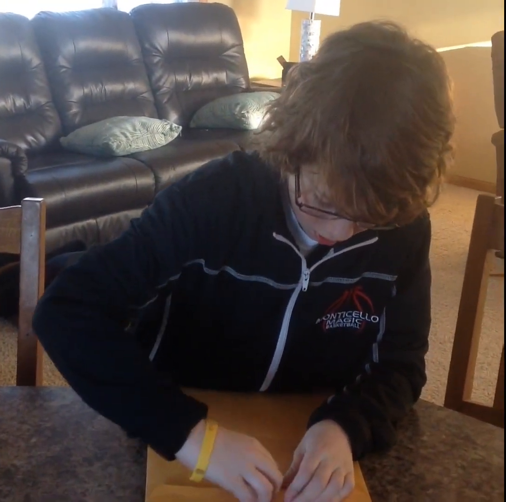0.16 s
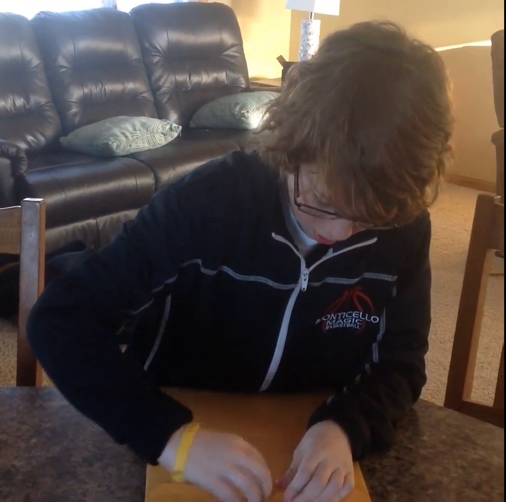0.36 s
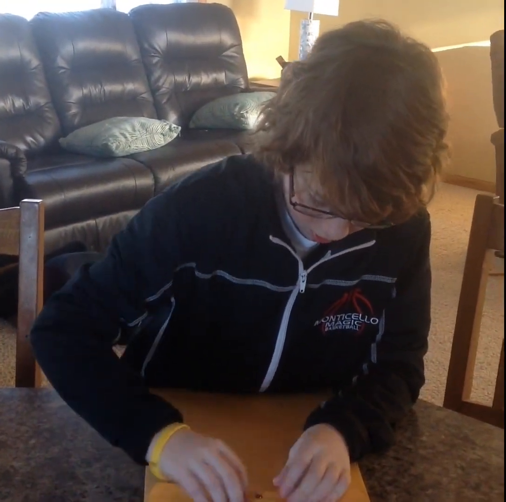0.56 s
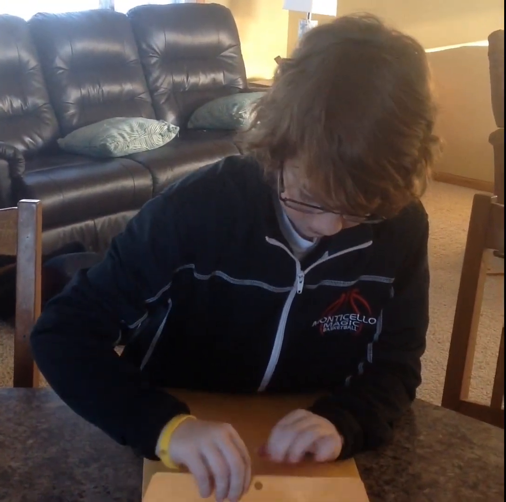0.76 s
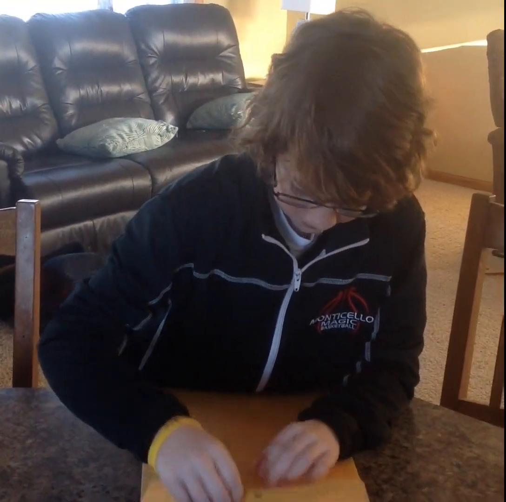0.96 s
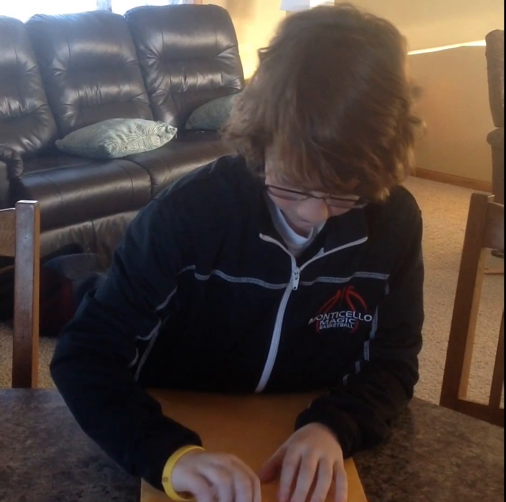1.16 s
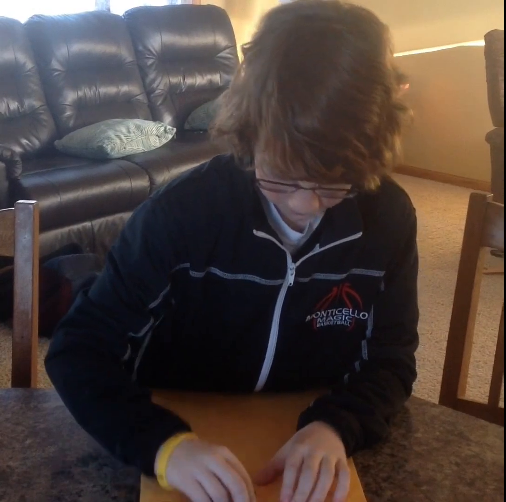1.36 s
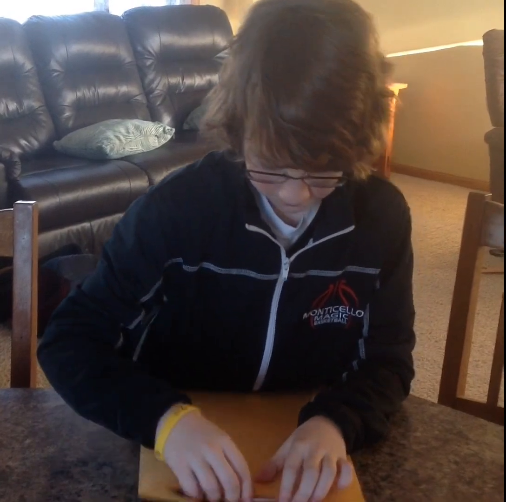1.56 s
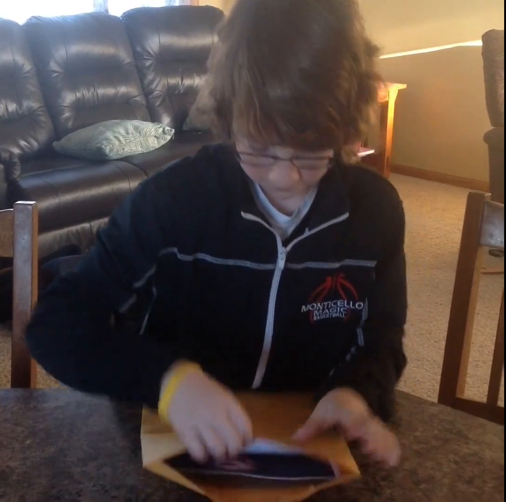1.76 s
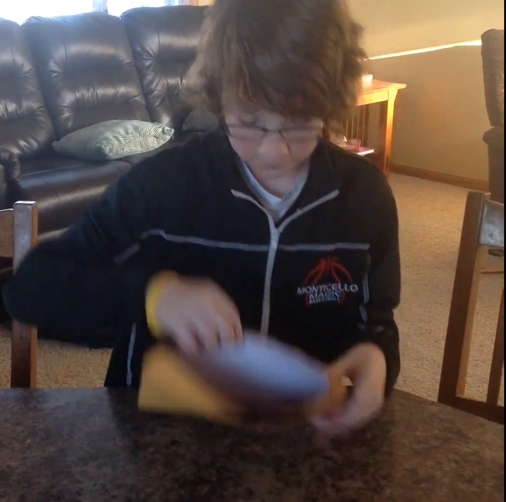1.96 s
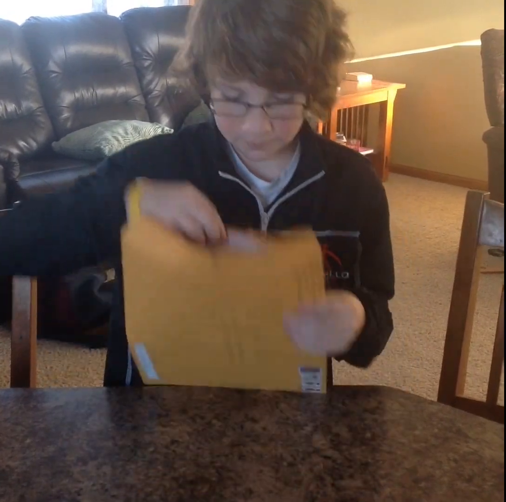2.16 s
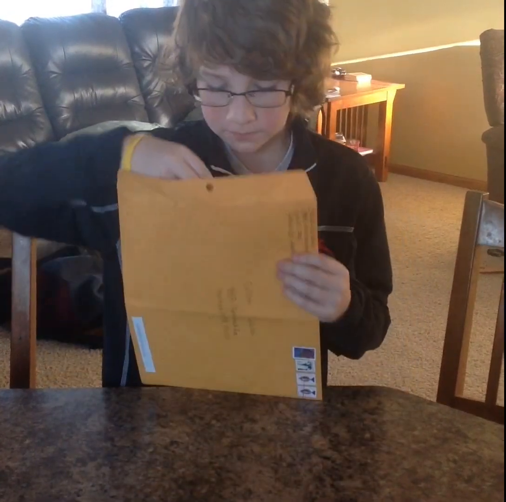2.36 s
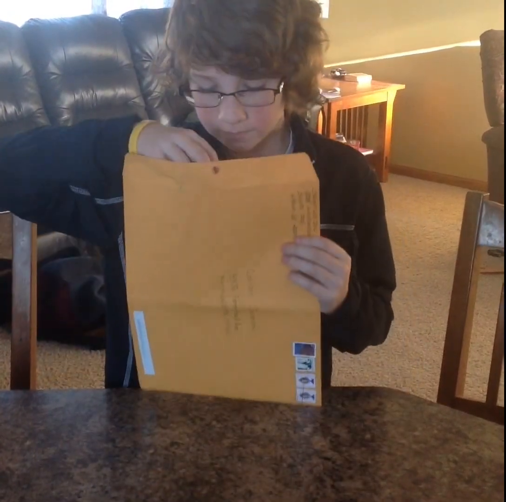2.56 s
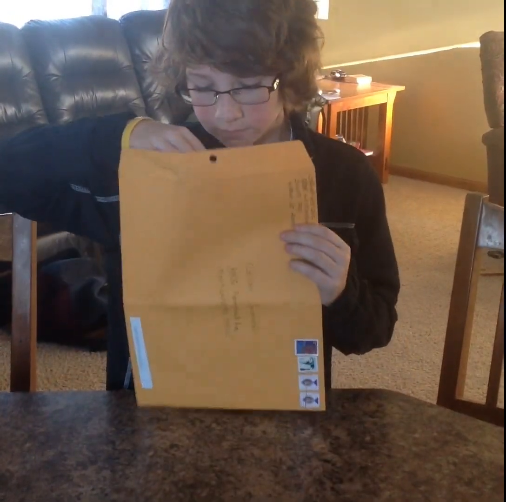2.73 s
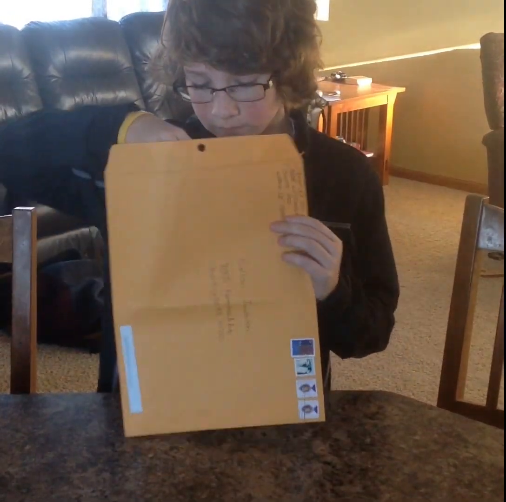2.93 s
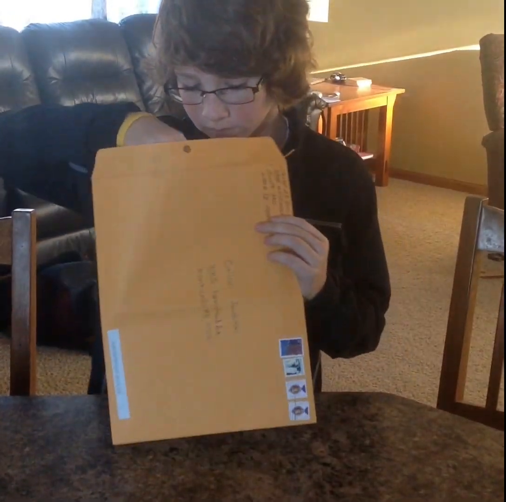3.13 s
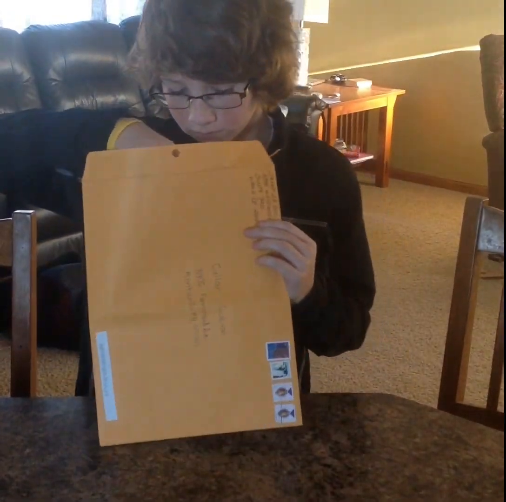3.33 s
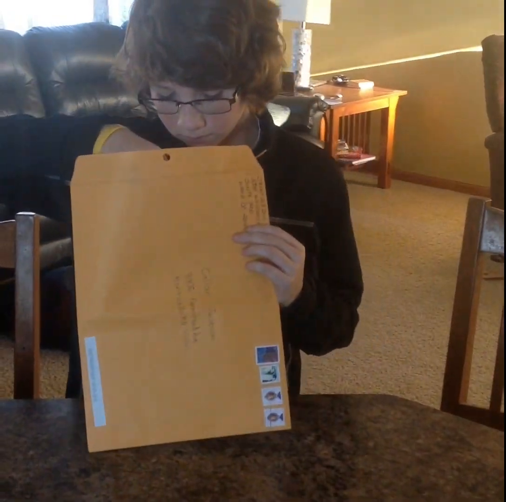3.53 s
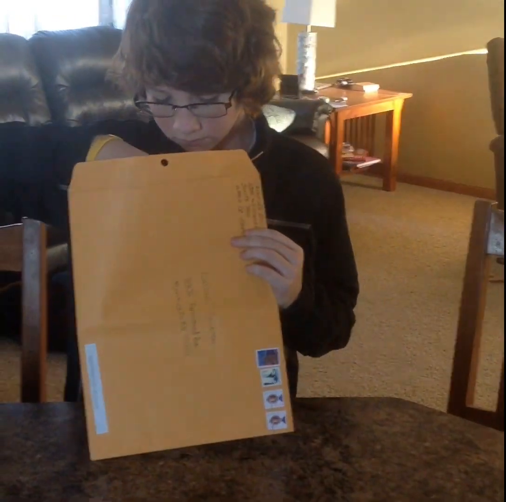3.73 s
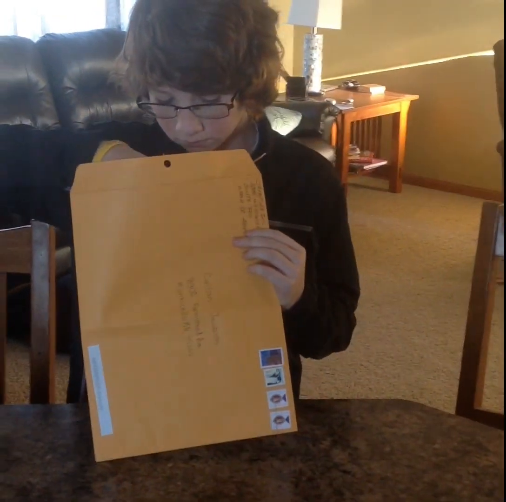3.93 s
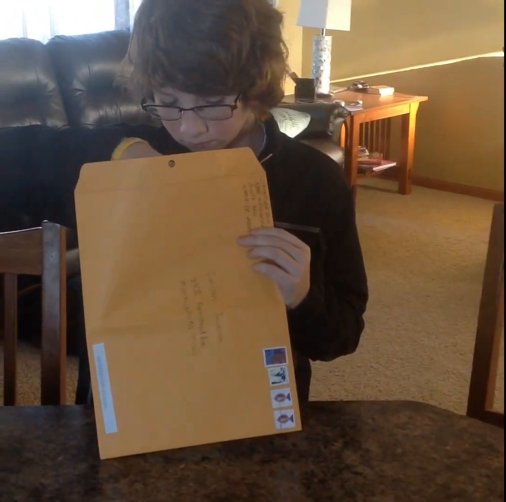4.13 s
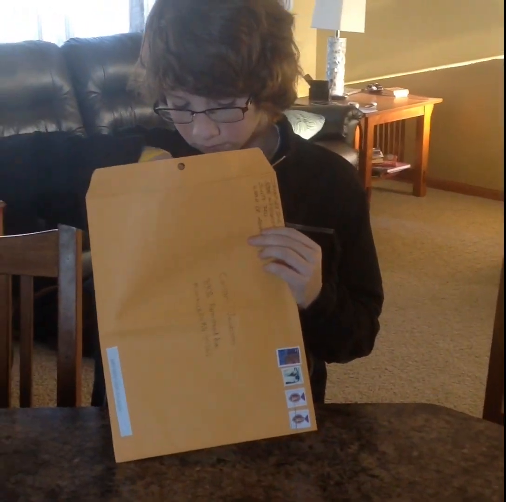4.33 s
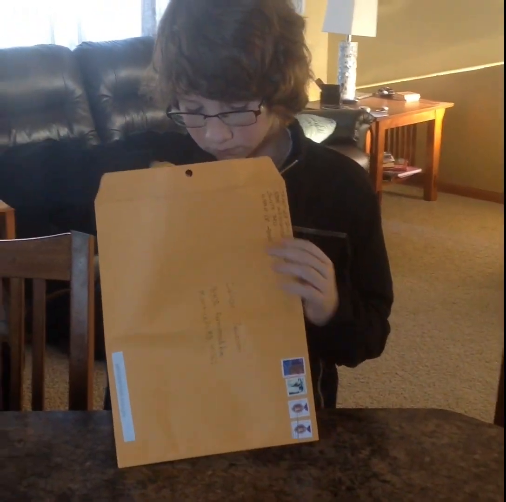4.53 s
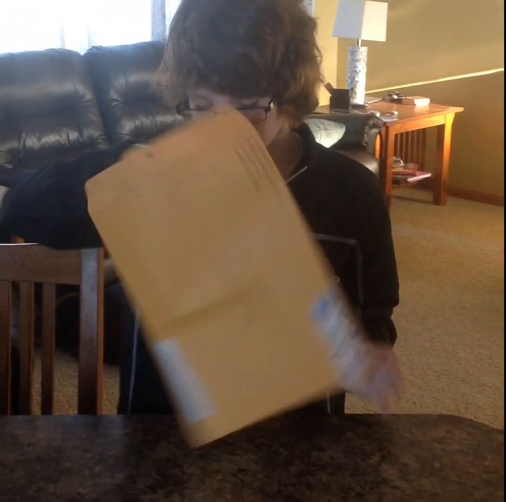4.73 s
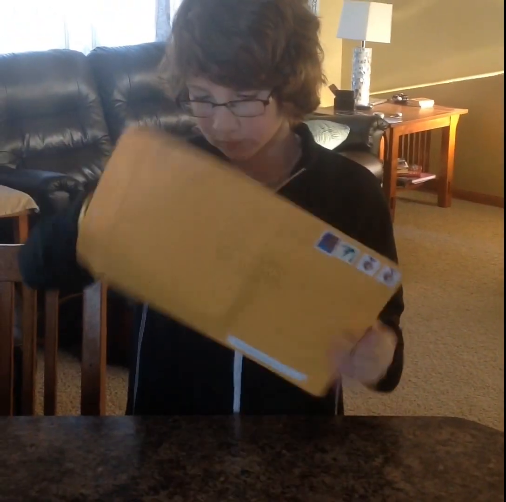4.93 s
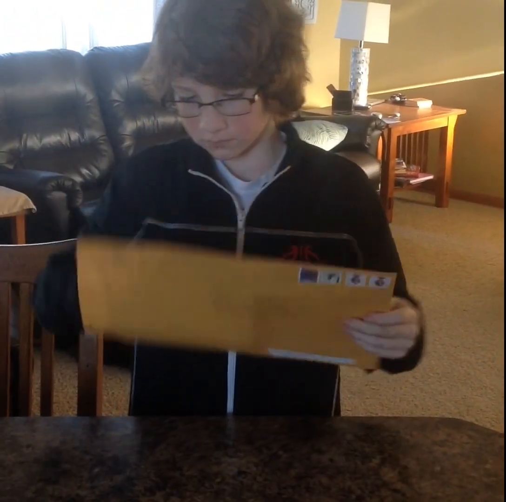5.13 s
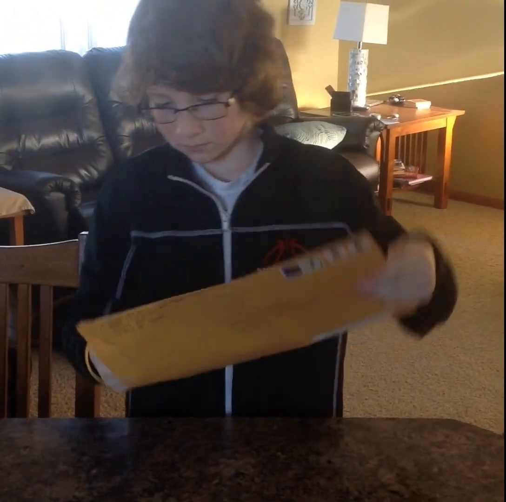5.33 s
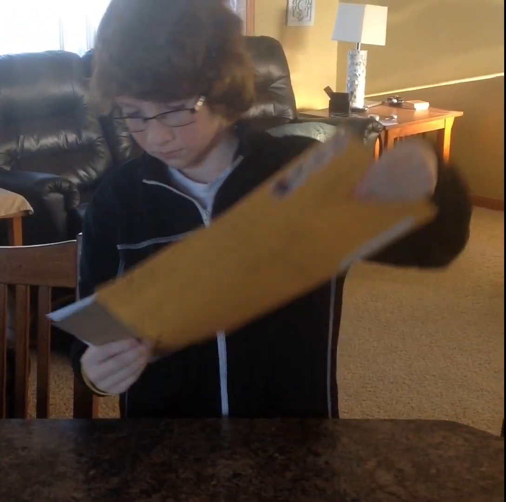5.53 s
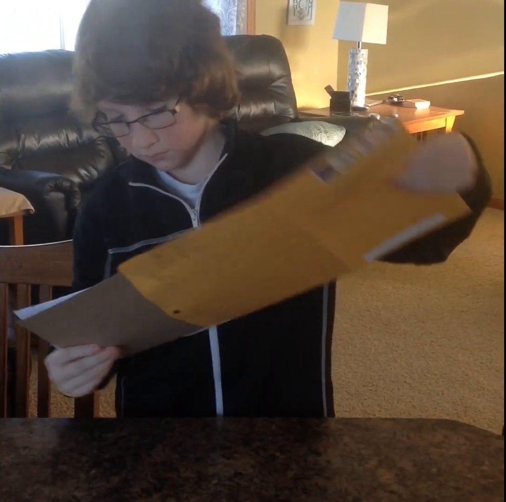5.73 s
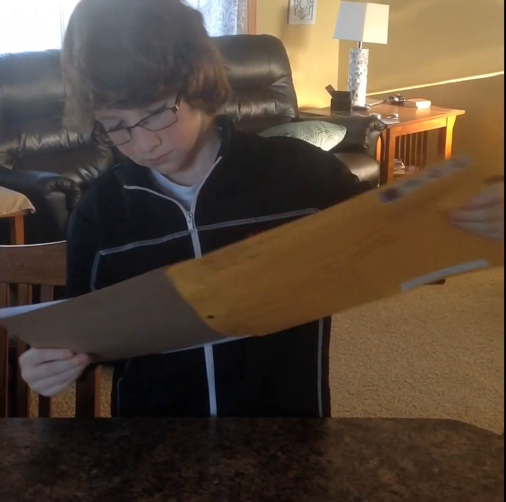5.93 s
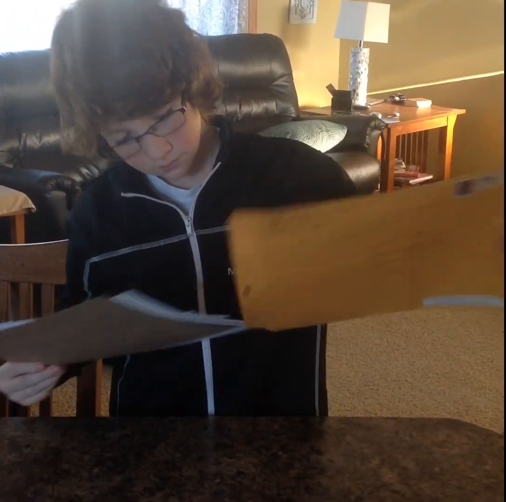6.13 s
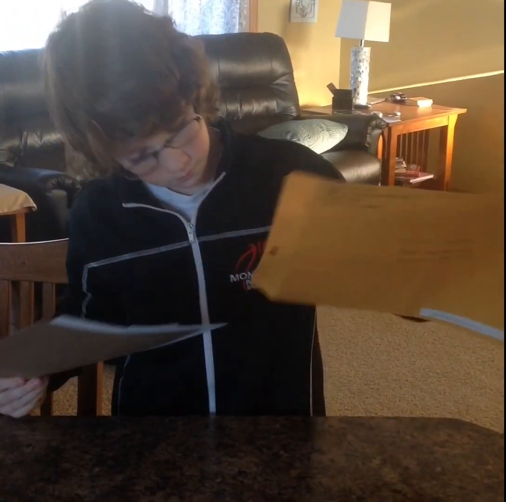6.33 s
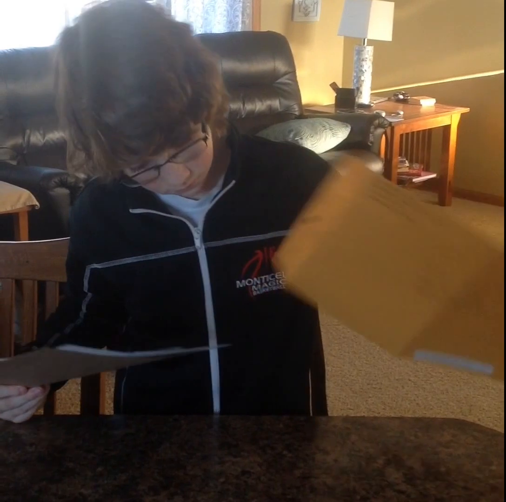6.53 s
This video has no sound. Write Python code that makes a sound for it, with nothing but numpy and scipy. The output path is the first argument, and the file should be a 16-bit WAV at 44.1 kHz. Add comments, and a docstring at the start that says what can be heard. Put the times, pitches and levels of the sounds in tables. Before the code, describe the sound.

A large paper envelope is unfastened at a table, close to the microphone, with soft rubbing, small pops and a dull fingertip press at about 1.3 seconds. The crackling builds, and at about 1.9 seconds the envelope flexes open with one sharp snap, the loudest sound. From 2.2 to 3.2 seconds the stiff paper buckles in crisp pops, crinkles and light thumps. Fingers then flick faintly at the sheets inside until about 4.2 seconds, when stronger crackles return, with a tiny click near 5 seconds. From about 5.2 to 6.2 seconds the papers slide out in several hissing strokes, their edge scraping lightly on the envelope's mouth amid more pops. A couple of weak crinkles follow by 6.6 seconds. Throughout, a clock ticks faintly once a second, stronger and weaker by turns, over the low air of a quiet living room.

```python
"""A large paper envelope is unfastened at a table and flexed open with one loud snap; papers slide out.
Stiff paper buckles in pops and thumps. Fingers and sheets rub in small slips, heard as hiss and crinkle;
the sheets' edge scrapes the envelope's mouth. A clock ticks in the quiet living room.
One microphone nearby hears it all."""
import sys
import numpy as np
from scipy import signal
from scipy.io import wavfile

SR = 44100
rng = np.random.default_rng(int(sys.argv[2]) if len(sys.argv) > 2 else 0)


def unload_audio(sound):
    """Save the sound as a 16-bit wav file, at the path given as the first command line argument."""
    columns = np.transpose(np.atleast_2d(sound))
    # keep every value between -1 and 1, then stretch to whole-number steps
    steps = np.round(np.clip(columns, -1, 1) * 32767)
    wavfile.write(sys.argv[1], SR, steps.astype(np.int16))


N = 290573

# the snap and its two early echoes: (time [s], level [dB], decay [s], crackle share [0-1])
SNAP_PEAKS = [(1.9307, -0.5, 0.0062, 1), (1.937, 1, 0.0024, 0.56), (1.9426, -3, 0.0018, 0.5)]
# buckles: (time [s], ring level [dB], corner [Hz], base decay [s], thump level [dB], crisp level [dB])
BUCKLES = [(0.121, -27.5, 1740, 0.0055, -36, -52), (0.591, -34, 3020, 0.0083, -45, -39),
           (0.714, -27, 2420, 0.0061, -45, -35), (0.814, -20.5, 1800, .012, -31.5, -30),
           (0.955, -29, 1410, .009, -39, -40), (1.068, -18, 2680, 0.0049, -28, -57),
           (1.137, -26.5, 3650, 0.0074, -28.5, -46), (1.727, -23, 2820, 0.014, -38, -35),
           (1.761, -21, 2480, 0.018, -34.5, -51), (1.822, -16, 1400, .012, -58, -32),
           (1.896, -16.5, 1190, 0.017, -45, -51), (2.211, -19.5, 850, .007, -29, -40),
           (2.276, -11.5, 3220, .006, -29, -23), (2.311, -16.5, 1660, 0.0015, -27, -43),
           (2.335, -9, 2960, 0.0052, -27, -46), (2.4432, -10, 3160, .0025, -26.5, -25.5),
           (2.647, -18, 2370, 0.025, -18.5, -49), (2.866, -19.5, 2870, .022, -38, -42),
           (3.039, -15, 2480, 0.0082, -25.5, -32), (3.158, -27, 1700, .015, -37, -46),
           (4.23, -23, 2900, .018, -23, -37), (4.285, -15.5, 2100, .026, -31, -44),
           (4.499, -22, 2130, 0.015, -28, -35), (4.531, -24, 1960, .01, -42, -34),
           (4.893, -29.5, 1890, 0.0085, -38, -40), (4.951, -24.5, 1810, .018, -46, -39),
           (5.034, -19.5, 3100, 0.048, -24, -33), (5.57, -17, 2510, 0.019, -27, -26),
           (5.757, -18, 1830, 0.013, -26, -37), (5.984, -16, 2100, 0.032, -21.5, -26),
           (6.249, -25, 2420, 0.0074, -42, -46), (6.553, -32, 1630, 0.0084, -28.5, -48)]
# paper patch with a 2000 Hz corner: (frequency [Hz], gain [dB], emphasis weight [ratio])
PATCH_SPECTRUM = [(99, -49, 0), (240, -5.5, 0), (485, 0.5, 0), (1300, 2.5, -0.3), (1600, 0.5, 0.3),
                  (1830, 0.5, 1.5), (2150, -1.5, 0.5), (2640, -6.5, 0.42), (3680, -15, 0.2), (9000, -35, 0)]
# paper on paper and skin: (start [s], rise [s], decay [s], level [dB])
STROKES = [ (0.64, 0.043, 0.028, -60.5), (0.755, 0.069, 0.019, -53), (1.11, .03, .03, -60),
           (1.23, .03, .05, -62), (1.28, 0.017, 0.045, -54.5), (1.44, 0.059, 0.051, -50.5),
           (1.55, 0.02, 0.048, -55.5), (2.519, 0.055, .16, -56.5), (2.69, .07, 0.094, -56.5),
           (2.8, 0.058, 0.12, -52.5), (3.26, .03, 0.15, -60.5), (3.449, 0.091, .4, -65),
           (3.79, 0.063, .03, -61), (4.16, 0.083, .08, -56.5), (4.31, .06, 0.074, -58.5),
           (4.655, 0.078, 0.048, -52), (4.872, 0.028, 0.031, -59), (5.025, 0.017, 0.034, -53),
           (5.16, 0.067, 0.16, -58.5), (5.254, 0.089, 0.12, -44), (5.469, 0.058, 0.17, -40),
           (5.67, 0.071, 0.19, -46.5), (5.849, 0.059, 0.092, -45.5), (5.96, 0.037, .04, -50),
           (6.029, .03, 0.046, -44.5), (6.16, .07, 0.021, -53.5)]
# envelope bending: (start [s], length [s], crinkle level [dB], rumble level [dB])
BENDS = [(0.665, 0.18, -62, -80), (1.056, 0.35, -76, -65.5), (1.44, 0.26, -70, -66),
         (1.677, 0.32, -60, -70), (2.197, 0.28, -55, -57.5), (2.464, 0.31, -53, -58),
         (2.785, 0.14, -51.5, -65), (3.05, 0.31, -62, -65), (3.64, 0.69, -63.5, -73),
         (4.166, 0.28, -57.5, -67.5), (4.618, 0.28, -59, -74), (4.841, 0.31, -64, -64),
         (5.247, 0.37, -54, -72), (5.53, 0.16, -53, -55.5), (5.728, 0.54, -60, -65.5)]
# sheet edge on the mouth: (start [s], length [s], starting resonance [Hz], level [dB])
SCRAPES = [(5.592, .06, 3220, -48), (5.745, .1, 3130, -49.5), (5.86, .08, 3670, -57),
           (6.198, .08, 2350, -60)]
# fingertip presses and tiny clicks: (time [s], level [dB])
PRESSES = [(1.298, -24)]
CLICKS = [(5.0217, -16.5)]
# spectral shapes: (frequency [Hz], gain [dB])
SNAP_SPECTRUM = [(53, -37), (110, -42), (182, -4.5), (257, -17.5), (362, -13.5), (688, -3.5), (850, -6.5),
                 (1130, -8), (1250, -7.5), (2090, -6), (2760, -3), (3280, -6.5), (5370, -7.5), (12600, -20),
                 (15000, -32)]
PANEL_SPECTRUM = [(40, -43), (80, -26), (120, -11), (175, 1), (340, 7), (520, -0.5), (1200, -22),
                  (4000, -68)]
CRISP_SPECTRUM = [(500, -6), (2500, 9), (5000, -1), (9000, 2), (15000, -24)]
SLIDE_SPECTRUM = [(250, -38), (600, -21), (1200, -14), (2000, -8.5), (3000, -3.5), (4500, -6), (7000, -5.5),
                  (11000, -8.5), (14300, -8), (15500, -20)]
CRINKLE_SPECTRUM = [(180, -38), (300, -19), (422, 0.5), (586, -24), (656, 1), (1030, -6), (1230, -2.5),
                    (1910, 0.5), (2080, -3.5), (3140, -2.5), (9000, -15), (11700, -16.5), (19800, -120)]
CLICK_SPECTRUM = [(500, -35), (2500, -15), (4500, -7), (6000, -0.5), (10000, 1), (15000, -9)]
ROOM_TONE_SPECTRUM = [(15, -76), (25, -57), (59, -25), (135, -2), (167, -0.5), (196, 0.5), (354, -0.5),
                      (450, -3.5), (488, -8.5), (833, -3.5), (978, -11.5), (1240, -5), (1580, -11.5),
                      (1960, -8.5), (3200, -13), (7000, -15), (15000, -18)]
# clock case modes: (frequency [Hz], relative level [dB], T60 [s])
CLOCK_MODES = [(723, 0, 0.037), (757, 2.5, 0.048), (1180, -11.5, 0.1), (1740, -4, 0.061), (1790, -3, 0.03),
               (3230, -6.5, 0.032)]
# room decay: (frequency [Hz], T60 [s])
ROOM_T60 = [(150, 0.34), (700, 0.62), (2500, 0.56), (5000, 0.45), (9000, 0.35), (12500, 0.23),
            (15000, 0.099)]
# table, wall and ceiling echoes: (delay [s], relative gain [ratio])
ECHOES = [(.0021, 0.22), (.0064, 0.35), (0.0124, 0.36), (0.017, .25), (.022, .22)]


def envelope_snap():
    """One loud snap, heard as three sharp peaks about 6 ms apart: the crack and two strong early echoes."""
    out, paper = np.zeros(N), impulse(SNAP_SPECTRUM)
    for time_s, level_db, decay_s, crackle in SNAP_PEAKS:
        peak = amp(level_db) * burst(paper, decay_s, crackle)
        add(out, time_s, room(peak, wet_db=-1.3, echo_db=-6))
    return out


def paper_buckles(hard_db=-16, emphasis_per_db=0.3, max_emphasis_db=5.5):
    """Each buckle rings a patch up to a corner set by its size and shoves the panel."""
    out, panel, edge = np.zeros(N), impulse(PANEL_SPECTRUM), impulse(CRISP_SPECTRUM)
    for time_s, ring_db, corner_hz, decay_s, thump_db, crisp_db in BUCKLES:
        # hard buckles bring out the patch's mode, just under the corner
        emphasis_db = np.clip(emphasis_per_db * (ring_db - hard_db), 0, max_emphasis_db)
        spectrum = [(hz, db + weight * emphasis_db) for hz, db, weight in PATCH_SPECTRUM]
        patch = impulse(spectrum, stretch=corner_hz / 2000)
        ring = amp(ring_db) * burst(patch, decay_s, crackle=1 - np.exp(-decay_s / 0.00057))
        crisp = amp(crisp_db) * burst(edge, decay_s + 0.0058, crackle=0.97)
        thump = amp(thump_db) * burst(panel, decay_s + 0.0022, crackle=0.99)
        add(out, time_s, room(ring + crisp + thump, wet_db=-3, echo_db=-2.5))
    return out


def paper_friction():
    """Strokes hiss in fine slips; bends crinkle in coarser ones and rumble the panels."""
    sliding = power_sum((start_s, amp(db) * stroke(rise_s, decay_s))
                        for start_s, rise_s, decay_s, db in STROKES)
    creasing = power_sum((start_s, amp(db) * arch(length_s)) for start_s, length_s, db, _ in BENDS)
    heaving = power_sum((start_s, amp(db) * arch(length_s)) for start_s, length_s, _, db in BENDS)
    hiss = sliding * slips(SLIDE_SPECTRUM, rate_hz=2500, spread_db=0, hiss_gain=1.33)
    crinkle = creasing * slips(CRINKLE_SPECTRUM, rate_hz=400, spread_db=0.5, hiss_gain=1)
    rumble = heaving * slips(PANEL_SPECTRUM, rate_hz=150, spread_db=4, hiss_gain=1)
    return room(hiss, wet_db=-6, echo_db=-43) + room(crinkle + rumble, wet_db=-5.5, echo_db=-15)


def edge_scrapes(climb_hz_per_s=1700, width_hz=480):
    """Slips of the sheets' edge drive a narrow resonance that climbs as they come out."""
    out, friction = np.zeros(N), slips(CRISP_SPECTRUM, rate_hz=590, spread_db=0, hiss_gain=0.6)
    for start_s, length_s, start_hz, level_db in SCRAPES:
        effort = arch(length_s)
        force = friction[round(start_s * SR):][:len(effort)]
        pitch_hz = start_hz + climb_hz_per_s * np.arange(len(effort)) / SR
        tone = resonate(resonate(force, pitch_hz, width_hz), pitch_hz, width_hz)
        add(out, start_s, amp(level_db) * effort * np.sqrt(len(tone)) * unit(tone))
    return out


def finger_flicks(start_s=3.4, length_s=0.8, rate_hz=14, min_db=-41.75, range_db=7):
    """Fingers flick the sheets inside: faint buckles of random time, size and strength."""
    out, spectrum = np.zeros(N), [(hz, db) for hz, db, _ in PATCH_SPECTRUM]
    for when, pitch, strength in rng.random((round(rate_hz * length_s), 3)):
        patch = impulse(spectrum, stretch=0.95 + pitch)
        flick = amp(min_db + range_db * strength) * burst(patch, decay_s=0.009, crackle=1)
        add(out, start_s + when * length_s, flick)
    return room(out, wet_db=-4, echo_db=-9)


def touches():
    """A fingertip presses the envelope on the table; later, a tiny click. Both close, nearly dry."""
    out, panel, click = np.zeros(N), impulse(PANEL_SPECTRUM, stretch=0.68), impulse(CLICK_SPECTRUM)
    for time_s, level_db in PRESSES:
        add(out, time_s, amp(level_db) * burst(panel, decay_s=0.0054, crackle=0.22))
    for time_s, level_db in CLICKS:
        add(out, time_s, amp(level_db) * burst(click, decay_s=0.001, crackle=0.29))
    return room(out, wet_db=-31, echo_db=-29)


def clock(first_s=0.46, tick_db=-21, tock_db=-35.5, attack_s=0.002):
    """The movement steps once a second, strong and weak by turns, ringing the small case."""
    out, t = np.zeros(N), np.arange(SR // 4) / SR
    case = sum(mode(t, hz, db, t60_s) for hz, db, t60_s in CLOCK_MODES)
    tick = unit(case * (1 - np.exp(-t / attack_s)))
    for step, time_s in enumerate(np.arange(first_s, N / SR)):
        add(out, time_s, amp(tock_db if step % 2 else tick_db) * tick)
    return room(out, wet_db=-6, echo_db=-9)


def room_tone(rms_db=-60):
    """Steady low murmur of room air, plus microphone hiss."""
    return amp(rms_db) * shaped(rng.standard_normal(N), ROOM_TONE_SPECTRUM)


def room(x, wet_db, echo_db, build_s=0.0015, size=24576):
    """Direct sound, early echoes, one low mode and a diffuse tail whose treble dies first."""
    hz, frame_s, noise = signal.stft(rng.standard_normal(size), SR, nperseg=256)
    decay = amp(-60 * frame_s / log_interp(ROOM_T60, hz)[:, None])
    tail = signal.istft(noise * decay, SR, nperseg=256)[1]
    t = np.arange(len(tail)) / SR
    diffuse = unit(tail * (1 - np.exp(-t / build_s)))
    response = amp(wet_db) * (diffuse + mode(t, hz=200, db=-49.5, t60_s=0.31))
    response[0] += 1
    for delay_s, gain in ECHOES:
        response[round(delay_s * SR)] += gain * amp(echo_db)
    return signal.oaconvolve(x, response)[:N]


def burst(response, decay_s, crackle, size=2048):
    """One sudden give and its dying crackle ring a response; unit energy."""
    t = np.arange(size) / SR
    force = np.sqrt(crackle) * unit(rng.standard_normal(size) * np.exp(-t / decay_s))
    force[0] = np.sqrt(1 - crackle)
    # flatten the force so the response sets the colour
    whitener = minimum_phase((abs(np.fft.fft(force, 2 * size)) ** 2 + 1) ** -0.5)
    drive = signal.fftconvolve(force, whitener)
    return unit(signal.fftconvolve(drive, response))


def slips(spectrum, rate_hz, spread_db, hiss_gain):
    """Fibres catch and slip in random grains over a smooth hiss; unit RMS."""
    sizes = amp(spread_db * np.minimum(rng.exponential(1, N), 3))
    grains = rng.choice([-1, 1], N) * sizes * (rng.random(N) < rate_hz / SR)
    force = unit(grains) + hiss_gain * unit(rng.standard_normal(N))
    return shaped(force, spectrum)


def stroke(rise_s, decay_s):
    """Stroke speed: smooth push, exponential coast."""
    t = np.arange(2 * SR) / SR
    push = np.sin(np.pi / 2 * np.minimum(t / rise_s, 1)) ** 2
    return push * np.exp(-np.maximum(t - rise_s, 0) / decay_s)


def arch(length_s):
    """Effort of a bend or scrape: a flattened half sine."""
    return abs(np.sin(np.linspace(0, np.pi, round(length_s * SR)))) ** 0.32


def power_sum(moves):
    """Overlapping gain curves add in power."""
    power = np.zeros(N)
    for start_s, gain in moves:
        add(power, start_s, gain ** 2)
    return np.sqrt(power)


def mode(t, hz, db, t60_s):
    """Damped cosine."""
    return amp(db - 60 * t / t60_s) * np.cos(2 * np.pi * hz * t)


def resonate(x, hz, width_hz):
    """Resonator tracking the curve hz."""
    carrier = np.exp(2j * np.pi * np.cumsum(hz) / SR)
    pole = np.exp(-np.pi * width_hz / SR)
    return 2 * (carrier * signal.lfilter([1 - pole], [1, -pole], x / carrier)).real


def shaped(x, spectrum):
    """Filters by a spectrum; unit RMS."""
    return np.sqrt(N) * unit(signal.oaconvolve(x, impulse(spectrum))[:N])


def impulse(spectrum, stretch=1, size=4096):
    """Impulse response of a spectrum stretched in frequency."""
    hz = abs(np.fft.fftfreq(size, 1 / SR))
    return minimum_phase(amp(log_interp(spectrum, hz / stretch)))


def minimum_phase(gain):
    """Causal unit-energy response from two-sided FFT gains."""
    log_spectrum = np.conj(signal.hilbert(np.log(gain + 1e-5)))
    return unit(np.fft.ifft(np.exp(log_spectrum)).real[:len(gain) // 2])


def log_interp(points, hz):
    """Table lookup on a log-frequency axis."""
    knots_hz, values = np.transpose(points)
    return np.interp(np.log(hz + 1), np.log(knots_hz + 1), values)


def add(mix, time_s, sound):
    """Mixes in place at time_s."""
    part = mix[round(time_s * SR):][:len(sound)]
    part += sound[:len(part)]


def amp(db):
    """dB to gain."""
    return 10 ** (np.asarray(db) / 20)


def unit(x):
    """Scales to unit energy."""
    return x / np.sqrt(np.sum(x ** 2) + 1e-20)


def scene():
    """All sources at one microphone, same on both channels."""
    mono = (paper_buckles() + finger_flicks() + envelope_snap() + touches() + clock()
            + paper_friction() + edge_scrapes() + room_tone())
    return np.array([mono, mono])


def record(dry):
    """Low-pass band limit."""
    cutoff_hz = 15500
    lowpass = signal.firwin(511, cutoff_hz, window=("kaiser", 9), fs=SR)
    return signal.oaconvolve(dry, lowpass[None], "same", axes=1)


dry = scene()
out = record(dry)
unload_audio(out)
```